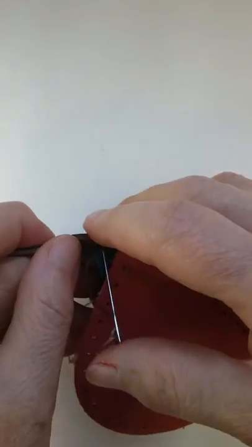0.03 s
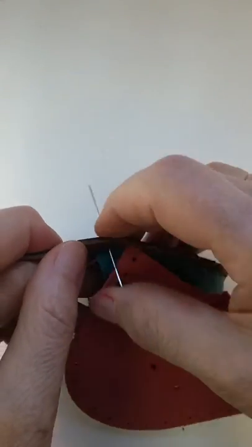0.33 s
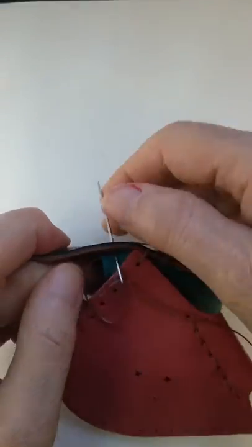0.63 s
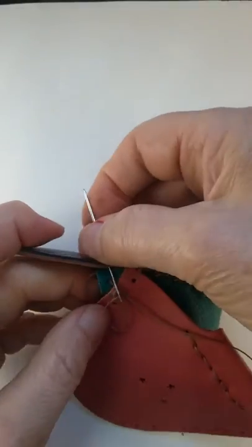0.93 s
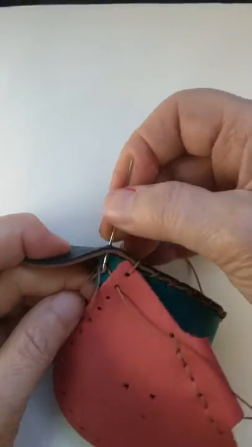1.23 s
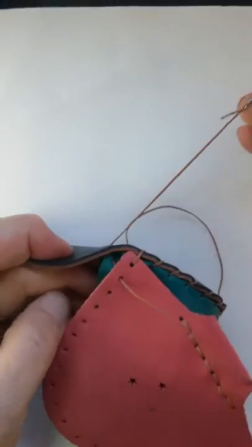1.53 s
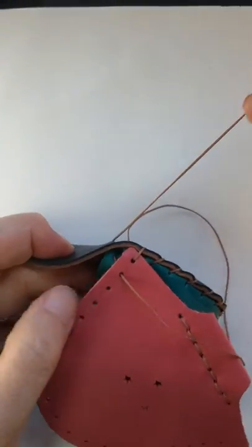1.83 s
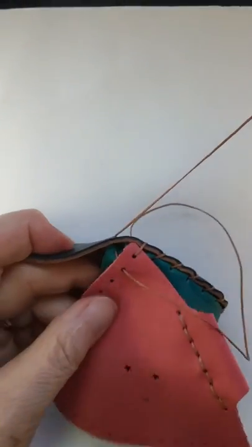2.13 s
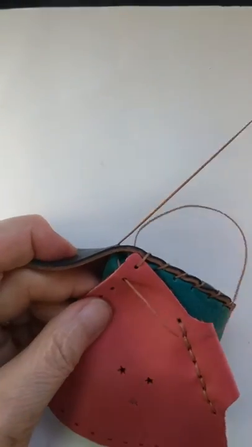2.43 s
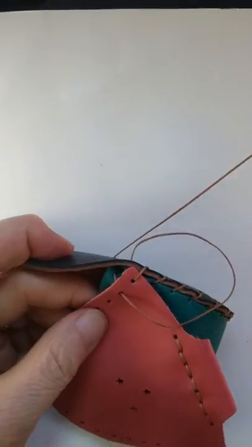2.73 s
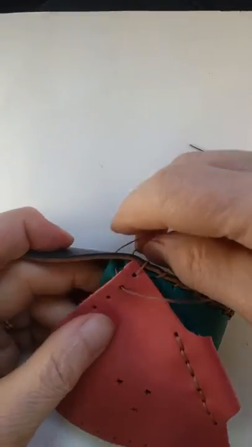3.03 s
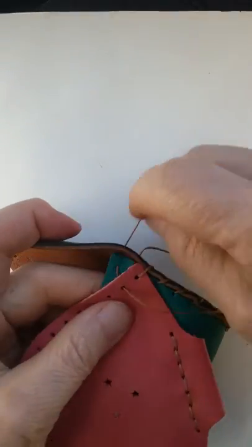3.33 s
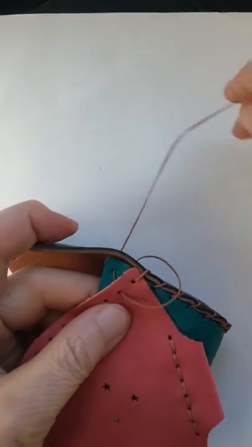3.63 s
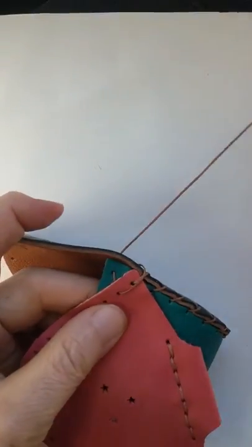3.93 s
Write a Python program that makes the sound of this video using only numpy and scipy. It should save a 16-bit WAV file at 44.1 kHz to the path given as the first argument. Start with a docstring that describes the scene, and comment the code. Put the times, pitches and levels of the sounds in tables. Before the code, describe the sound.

Thread is pulled through leather, close by in a small quiet room. Fingers rub and a needle ticks, then come a quick rasp, a slow pull, a sharp snap and a harder crackling, squeaking pull.

```python
"""A leather shoe is stitched by hand, close by, in a small quiet room.
First fingers rub the leather while needle and thread scuff and tick. At 1.3 s a quick pull rasps
through a punched hole and makes the hollow upper rumble; a slow pull follows, with a tug and a hum.
Near 2.9 s the caught thread snaps free, the loudest moment. From 3.4 s a second thread is hauled
through, crackling and squeaking, and drawn tight with one last snap."""
import sys
import numpy as np
from scipy import signal
from scipy.fft import rfft, irfft, next_fast_len
from scipy.io import wavfile

SR = 44100
rng = np.random.default_rng(int(sys.argv[2]) if len(sys.argv) > 2 else 0)


def inscribe(sig):
    """Save sig as 16-bit PCM at rate SR to the path in sys.argv[1].

    A 1-D sig is mono; a 2-D sig holds one channel per row.
    Samples are clipped to [-1, 1] before scaling.
    """
    pcm = np.round(np.clip(np.atleast_2d(sig).T, -1, 1) * 32767)
    wavfile.write(sys.argv[1], SR, pcm.astype(np.int16))


N = 176400
TIME = np.arange(N) / SR


def from_db(db):
    """Decibels to gain."""
    return 10 ** (np.asarray(db) / 20)


def rms_one(x):
    """Scale to an rms of one."""
    return x / np.sqrt(np.mean(x ** 2) + 1e-20)


def drift(rate_hz):
    """A random wobble that glides to a new value rate_hz times a second."""
    knots = rng.standard_normal(4096)
    return np.interp(TIME * rate_hz, np.arange(len(knots)), knots)


def colour(x, spectrum):
    """Minimum-phase EQ through the given (Hz, dB) points."""
    size = 2 * next_fast_len(len(x) // 2 + 2048)
    hz, db = np.transpose(spectrum)
    bins = np.maximum(np.arange(size // 2 + 1) * SR / size, 1)
    gain = from_db(np.interp(np.log(bins), np.log(hz), db))
    cepstrum = irfft(np.log(gain))
    cepstrum[1:size // 2] *= 2
    cepstrum[size // 2 + 1:] = 0
    return irfft(rfft(x, size) * np.exp(rfft(cepstrum)))[:len(x)]


def resonate(x, hz, width_hz):
    """One resonance with unity gain at its peak."""
    r = np.exp(-np.pi * width_hz / SR)
    poles = [1, -2 * r * np.cos(2 * np.pi * hz / SR), r * r]
    return signal.lfilter(np.array([1, 0, -1]) * (1 - r * r) / 2, poles, x + 1e-18)


def roll_off(x, order, hz, kind):
    """Butterworth low-, high- or band-pass."""
    return signal.sosfilt(signal.butter(order, hz, kind, fs=SR, output="sos"), x)


def place(out, s, peak_db, x):
    """Drop a hit into out at time s, scaled to the given peak."""
    start = int(s * SR)
    out[start:start + len(x)] += from_db(peak_db) * x[:N - start] / np.abs(x).max()


def friction(slips_per_s, spread_db, hiss_db):
    """Fibres catch and slip at random, over a smooth sliding hiss."""
    sizes = from_db(spread_db * np.minimum(rng.exponential(1, N), 3)) * rng.choice([-1, 1], N)
    slips = rms_one(sizes * (rng.random(N) < slips_per_s / SR))
    return rms_one(slips + from_db(hiss_db) * rng.standard_normal(N))


def strokes(rows, source, width_hz, broad_db, rise_share=0.49, skirt_db=19.5):
    """Each stroke of friction swells and fades, ringing at its own pitch over some broadband bleed."""
    out = np.zeros(N)
    for s, length, db, hz in rows:
        rise, fall = length * rise_share, length * (1 - rise_share)
        span = slice(max(int((s - 2 * rise) * SR), 0), int((s + 2 * fall) * SR))
        t, grain = TIME[span] - s, source[span]
        swell = from_db(-skirt_db * np.abs(t / np.where(t < 0, rise, fall)) ** 2.57)
        stroke = swell * (resonate(grain, hz, width_hz) + from_db(broad_db) * grain)
        out[span] += from_db(db) * rms_one(stroke) * np.sqrt(np.mean(swell ** 2))
    return out


# The dark tone of the room. Each row: frequency in Hz, gain in dB.
AIR_EQ = [(29, -22), (50, 1), (103, 4.5), (321, 5), (863, -6), (1350, -3.5), (2950, -11.5), (3950, -9),
          (5670, -20), (15000, -20)]


def room_tone():
    """Still air lays a soft, steady bed of noise."""
    return from_db(-62) * rms_one(colour(rng.standard_normal(N), AIR_EQ))


def room_reverb(x, t60_s=0.17, wet_db=-15):
    """Near walls return a faint, short tail."""
    t = TIME[:SR // 2]
    tail = rng.standard_normal(len(t)) * from_db(-60 * t / t60_s) * (t > .005)
    return from_db(wet_db) * signal.fftconvolve(x, tail / np.sqrt(np.sum(tail ** 2)))[:N]


# The ring that every contact shares. Each row: frequency in Hz, mix level in dB.
SHOE_MODES = [(324, -9), (429, -6), (857, -27), (1032, -24), (2211, 1.5), (3406, -20)]


def shoe_ring(x):
    """The shoe and its surroundings ring briefly at their own modes."""
    return from_db(-1) * (x + sum(from_db(db) * resonate(x, hz, width_hz=20) for hz, db in SHOE_MODES))


# The bright tone of touched leather, for rustle, scuffs, squeaks and snaps.
# Each row: frequency in Hz, gain in dB.
CONTACT_EQ = [(100, -26.5), (400, -1), (1000, -7.5), (2000, -0.5), (2800, -1.5), (4500, 1), (5700, -7.5),
              (7500, -13.5), (10000, -22.5), (16000, -29)]


def hand_rustle():
    """The hands keep up a faint, restless rustle on the leather."""
    grain = colour(friction(slips_per_s=460, spread_db=3, hiss_db=-5), CONTACT_EQ)
    return rms_one(grain) * from_db(-73 - 6.5 * drift(24.8))


# The dull tone of skin on leather. Each row: frequency in Hz, gain in dB.
SKIN_EQ = [(45, -28), (120, -5.5), (380, -5.5), (750, -11), (1500, -11), (2600, -16.5), (16000, -43.5)]
# Low finger rubs. Each row: peak time in seconds, length in seconds, level in dB, ring in Hz.
RUBS = [(.03, 0.17, -59, 320), (.328, 0.066, -44.5, 397), (.429, 0.075, -47.5, 394), (.515, 0.17, -48, 382),
        (.521, 0.016, -49.5, 410), (.598, 0.028, -53.5, 382), (.961, 0.057, -48.5, 400),
        (1.262, 0.08, -44, 345), (1.268, 0.05, -50, 120), (1.307, 0.031, -43.5, 407),
        (1.485, 0.064, -51, 90), (1.567, 0.051, -38.5, 325), (1.739, 0.02, -51.5, 328),
        (2.858, 0.081, -44, 350), (2.949, 0.048, -34.5, 368), (2.995, 0.054, -47, 396),
        (3.557, 0.043, -41, 365)]


def finger_rubs():
    """Fingers rub and flex the hollow upper, which answers with a low, narrow ring."""
    skin = colour(friction(slips_per_s=1200, spread_db=-2, hiss_db=-4), SKIN_EQ)
    return strokes(RUBS, skin, width_hz=66, broad_db=-11.5)


# Short, dry scuffs. Each row: peak time in seconds, length in seconds, level in dB, ring in Hz.
SCUFFS = [(.102, 0.017, -50.5, 3730), (.131, 0.019, -41, 4020), (.234, 0.017, -52.5, 3850),
          (.411, 0.026, -49.5, 3570), (.436, 0.068, -48.5, 3900), (.53, 0.11, -56.5, 4200),
          (.580, 0.015, -45, 4160), (.612, 0.038, -47.5, 1970), (.831, 0.036, -54.5, 2220),
          (.866, 0.038, -54.5, 3180), (.976, 0.1, -53.5, 3650), (1.109, 0.018, -49.5, 1950),
          (1.168, 0.061, -50, 2100), (1.269, 0.16, -58, 3480), (1.589, .01, -43, 4140),
          (1.619, 0.012, -45.5, 3770), (2.801, 0.016, -50, 4200), (3.045, 0.12, -58.5, 2280),
          (3.155, 0.071, -59, 3600), (3.262, 0.11, -58, 1990), (3.882, 0.021, -41, 3460),
          (3.972, 0.014, -36, 4500)]


def needle_scuffs(scrape):
    """Needle and thread brush across the leather."""
    return strokes(SCUFFS, scrape, width_hz=1500, broad_db=-6)


# Tiny squeaks. Each row: peak time in seconds, length in seconds, level in dB, ring in Hz.
SQUEAKS = [(0.598, 0.0063, -39, 2230), (2.9216, 0.019, -45, 2150), (3.602, 0.032, -36, 2350),
           (3.973, 0.025, -36.5, 1900)]


def wax_squeaks(scrape, octave_db=-9.5):
    """Waxed thread squeaks as it tightens, with a weaker ring an octave up."""
    octaves = [(s, length, db + octave_db, 2 * hz) for s, length, db, hz in SQUEAKS]
    return strokes(SQUEAKS + octaves, scrape, width_hz=370, broad_db=-21)


# A sagging note late in the slow pull. Each row: time in seconds, level in dB, pitch in Hz.
HUM_CURVE = [(2.35, -88, 260), (2.48, -55.5, 251), (2.58, -66, 251), (2.632, -49, 238), (2.665, -72, 236)]


def thread_hum():
    """The hole bows the taut thread into a faint, wavering note."""
    s, db, hz = np.transpose(HUM_CURVE)
    phase = 2 * np.pi * np.cumsum(np.interp(TIME, s, hz)) / SR + .5 * drift(50)
    gain = from_db(np.interp(TIME, s, db) + 2 * drift(50))
    return gain * rms_one(np.sin(phase)) * (TIME > s[0]) * (TIME < s[-1])


# Resonances of the taut thread. Each row: frequency in Hz, width in Hz, mix level in dB.
THREAD_MODES = [(1394, 65, 3.5), (3600, 62, -1.5), (3920, 62, -0.5), (4480, 90, -18)]


def taut_ring(x):
    """The stretched thread rings along with the friction."""
    return x + sum(from_db(db) * resonate(x, hz, width) for hz, width, db in THREAD_MODES)


# A zip in the slow pull. Each row: peak time in seconds, length in seconds, level in dB, ring in Hz.
TUGS = [(2.2565, 0.047, -38.5, 3950)]


def thread_tug(scrape):
    """A short tug zips the taut thread through."""
    return strokes(TUGS, taut_ring(scrape), width_hz=1500, broad_db=-6)


# Dry crackle in the hard pull. Each row: start in seconds, peak level in dB.
CATCHES = [(3.5311, -27), (3.551, -23.5), (3.5535, -24), (3.5587, -22), (3.5716, -20), (3.5777, -21)]


def thread_catches(band_hz=(1910, 4570)):
    """The thread catches and slips in the tight hole, one dry click each time."""
    click, out = signal.unit_impulse(SR // 20) + 1e-18, np.zeros(N)
    for _ in range(2):
        click = roll_off(click, 2, band_hz, "band")
    for s, db in CATCHES:
        place(out, s, db, click)
    return out


# Thread snaps and needle ticks. Each row: start in seconds, peak level in dB, ring in Hz.
SNAPS = [(0.5968, -28.5, 2080), (0.6807, -44, 3600), (0.7249, -41, 3580), (1.05, -41, 6300),
         (1.089, -36.5, 4600), (1.152, -35.5, 6900), (1.2235, -40.5, 3330), (1.2743, -30.5, 3630),
         (1.3442, -33.5, 3900), (1.667, -36.5, 3720), (1.7307, -47, 900), (2.78, -26, 2100),
         (2.9283, -7, 3470), (2.956, -19.5, 5860), (2.9576, -19, 4400), (2.9713, -22, 3570),
         (3.037, -29, 2040), (3.375, -36.5, 5700), (3.9553, -23.5, 2140)]


def thread_snaps(rebound_s=.00135, shiver_t60_s=0.033, thud_t60_s=0.17):
    """Caught thread lets go: a sharp kick and rebound, a duller shiver, a thud as the leather jolts."""
    out, t = np.zeros(N), TIME[:SR // 8]
    kick = np.zeros(len(t))
    kick[0], kick[int(rebound_s * SR)] = 1, -.85
    for s, db, hz in SNAPS:
        shiver, thud = rng.standard_normal((2, len(t)))
        release = kick + roll_off(shiver, 2, 5350, "low") * from_db(-22 - 60 * t / shiver_t60_s)
        thud = resonate(thud * from_db(-23 - 60 * t / thud_t60_s), hz=726, width_hz=435)
        ring, crack = resonate(release, hz, width_hz=820), from_db(-7) * release
        snap = colour(ring + crack + thud, CONTACT_EQ)
        place(out, s, db, roll_off(snap, 1, 7300, "low"))  # leather cushions the top end
    return out


def flaring_ring(x, flares_hz=(2320, 3540)):
    """Two resonances flare independently as the thread shifts in the hole."""
    return x + sum(resonate(x, hz, width_hz=280) * from_db(-5 + 6 * drift(80)) for hz in flares_hz)


# The boxy body of the hollow upper. Each row: frequency in Hz, gain in dB.
UPPER_EQ = [(30, -27), (75, -2.5), (200, -7), (350, -5.5), (550, -7.5), (800, -34), (1350, -11),
            (2200, -11), (4500, -39), (8000, -33), (16000, -42)]


def pull(faders, rasp_eq, ringing, slips, uneven_db, upper_hz):
    """Thread runs through a hole: the same slips make the rasp and shake the upper."""
    s, rasp_db, rumble_db = np.transpose(faders)
    slips = slips * from_db(uneven_db * drift(170))
    rasp = rms_one(colour(ringing(slips), rasp_eq))
    body = colour(slips, UPPER_EQ)
    rumble = rms_one(resonate(body, upper_hz, width_hz=230) + from_db(-7.5) * body)
    rasp_gain = from_db(np.interp(TIME, s, rasp_db, left=-120, right=-120))
    rumble_gain = from_db(np.interp(TIME, s, rumble_db, left=-120, right=-120))
    return rasp * rasp_gain + rumble * rumble_gain


# Fader moves for the four pulls. Each row: time in seconds, rasp level in dB, rumble level in dB.
QUICK_PULL = [(1.325, -55, -56), (1.365, -52, -53), (1.41, -50.5, -60), (1.468, -43.5, -51),
              (1.48, -40, -49), (1.512, -38, -51.5), (1.55, -45.5, -39), (1.62, -50.5, -53),
              (1.665, -64, -58)]
SLOW_PULL = [(1.79, -80, -89.5), (1.90, -61, -73), (1.956, -78, -88), (2.04, -58, -71), (2.11, -78, -78),
             (2.36, -72, -70), (2.44, -55.5, -62.5), (2.55, -51.5, -58.5), (2.64, -54.5, -57.5),
             (2.678, -92, -91)]
HARD_PULL = [(3.40, -62, -75), (3.44, -48, -55.5), (3.505, -39, -51.5), (3.55, -37.5, -41),
             (3.585, -45, -48), (3.642, -40.5, -52.5), (3.662, -48, -59), (3.69, -76, -65)]
TIGHTENING = [(3.70, -61, -72), (3.729, -57.5, -62), (3.736, -44.5, -60), (3.80, -47, -52),
              (3.85, -46.5, -49.5), (3.903, -36, -47), (3.945, -49.5, -48.5), (3.98, -54, -47),
              (4.0, -69, -49)]
# The tone of each rasp; the tightening shares the hard one. Each row: frequency in Hz, gain in dB.
QUICK_EQ = [(410, -35), (700, -12.5), (1380, -6), (2400, -6.5), (3570, -3.5), (4610, -1), (5310, -7.5),
            (7130, -21), (15000, -40.5)]
SLOW_EQ = [(410, -34), (650, 2.5), (900, -3.5), (1900, -4.5), (2660, -6), (3600, -0.5), (4700, -7.5),
           (5600, -14), (9000, -28), (15000, -33)]
HARD_EQ = [(410, -39), (700, -6), (848, -11), (1150, -6.5), (1900, -8), (2250, -4), (3060, -8), (3660, -7),
           (4550, -6), (5040, -13), (7410, -25.5), (15000, -45.5)]


def thread_pulls():
    """The first thread is drawn quickly, then slowly; the second is hauled out, then tightened."""
    quick = pull(QUICK_PULL, QUICK_EQ, flaring_ring,
                 friction(slips_per_s=750, spread_db=2, hiss_db=-1.5), uneven_db=2.45, upper_hz=308)
    slow = pull(SLOW_PULL, SLOW_EQ, taut_ring,
                friction(slips_per_s=4300, spread_db=2.5, hiss_db=-1.5), uneven_db=2, upper_hz=326)
    hard = pull(HARD_PULL, HARD_EQ, flaring_ring,
                friction(slips_per_s=1300, spread_db=3, hiss_db=-9.5), uneven_db=1.5, upper_hz=350)
    tight = pull(TIGHTENING, HARD_EQ, flaring_ring,
                 friction(slips_per_s=2700, spread_db=5, hiss_db=-3), uneven_db=0, upper_hz=357)
    return quick + slow + hard + tight


def scene():
    """All the handwork rings through the shoe and sits in the quiet room, in mono."""
    pulls = thread_pulls()
    scrape = colour(friction(slips_per_s=1600, spread_db=0.5, hiss_db=4), CONTACT_EQ)
    scrapes = needle_scuffs(scrape) + thread_tug(scrape) + wax_squeaks(scrape)
    hands = finger_rubs() + hand_rustle()
    work = shoe_ring(pulls + scrapes + hands + thread_hum() + thread_catches() + thread_snaps())
    return (room_tone() + work + room_reverb(work))[None]


def record(dry, low_cut_hz=28, high_cut_hz=15800):
    """The microphone loses the deep bass; the top is cut steeply."""
    thin = roll_off(dry, 2, low_cut_hz, "high")
    return signal.sosfilt(signal.ellip(10, .1, 70, high_cut_hz, fs=SR, output="sos"), thin)


dry = scene()
out = record(dry)
inscribe(out)
```